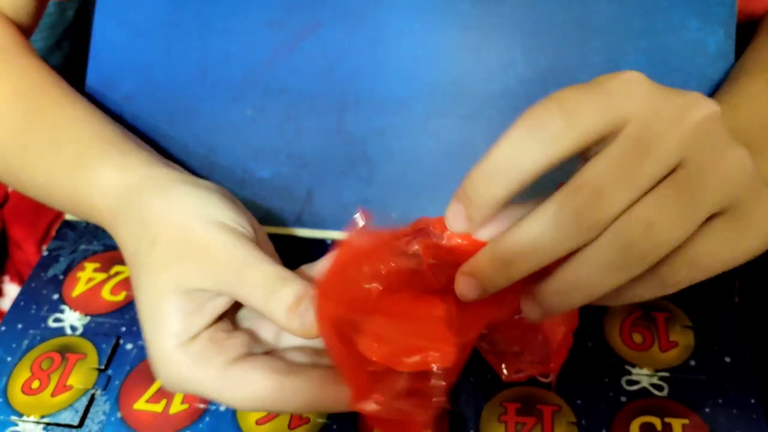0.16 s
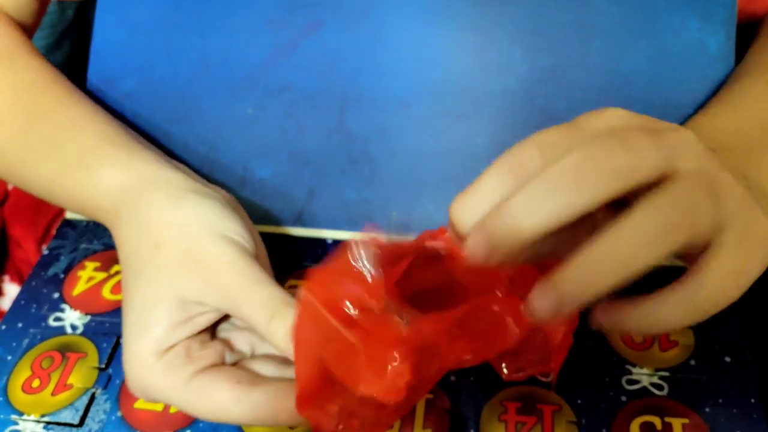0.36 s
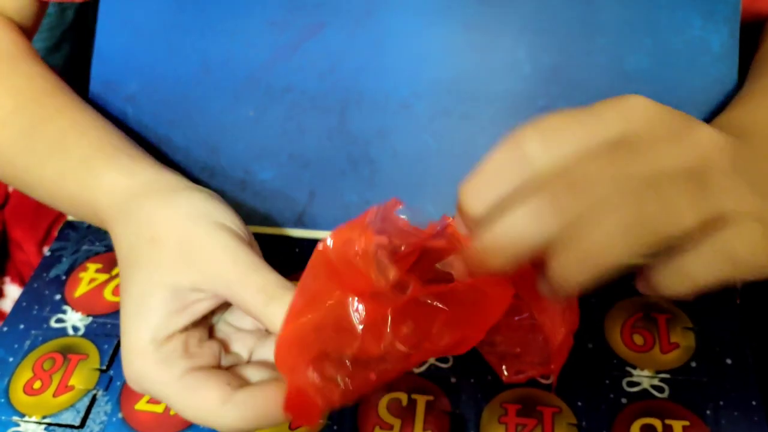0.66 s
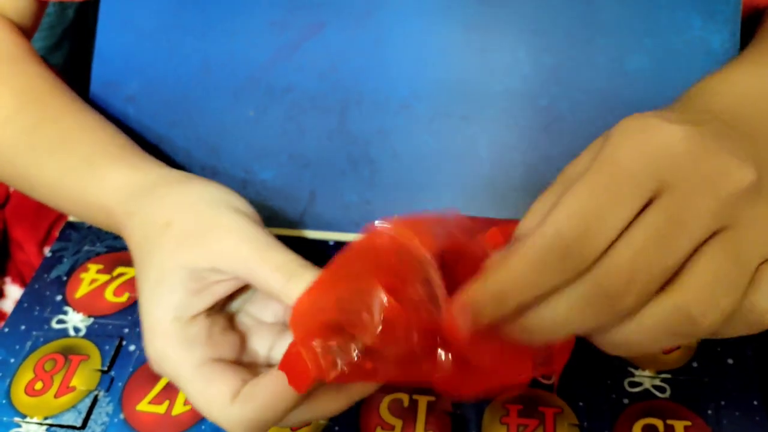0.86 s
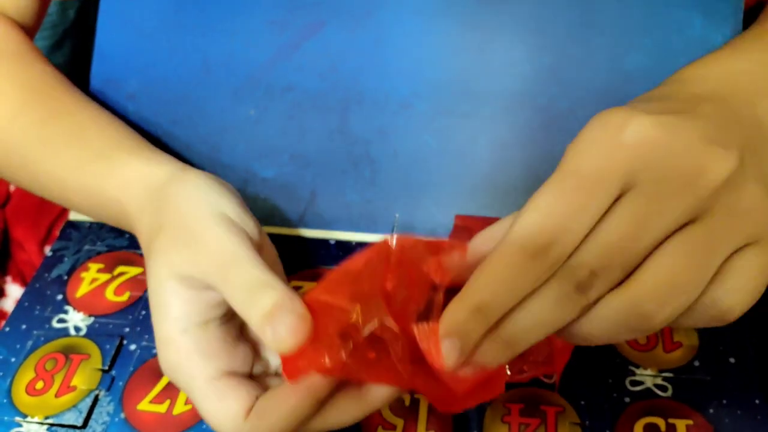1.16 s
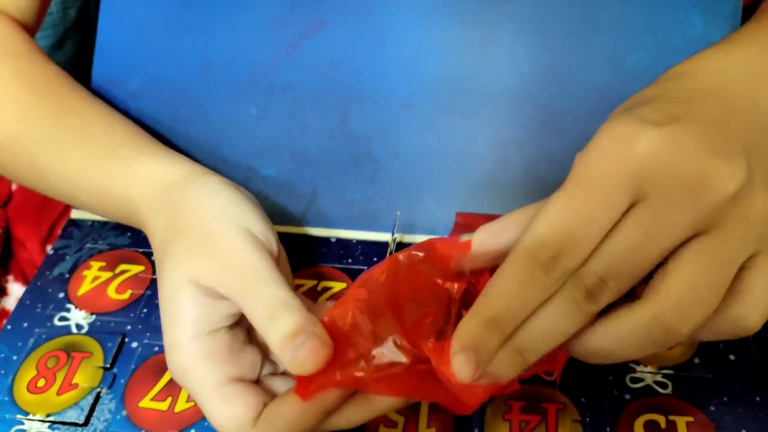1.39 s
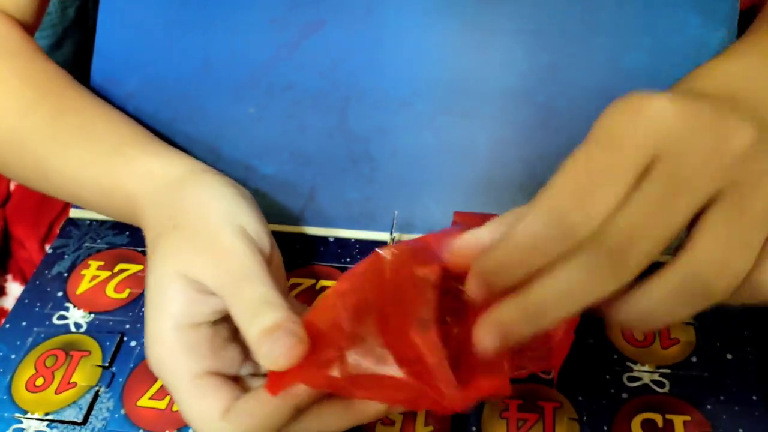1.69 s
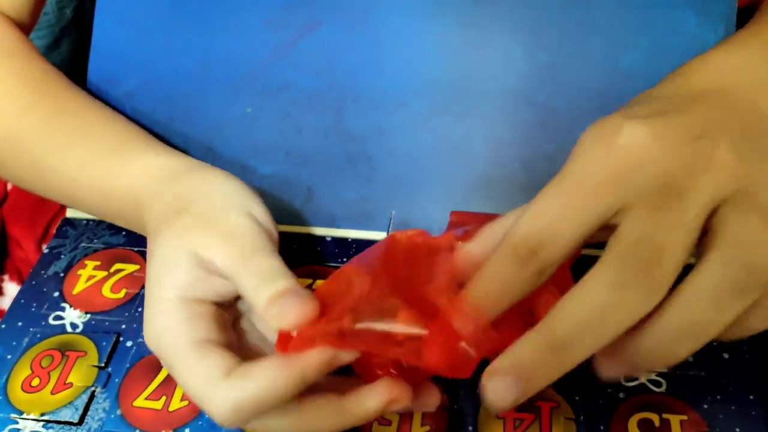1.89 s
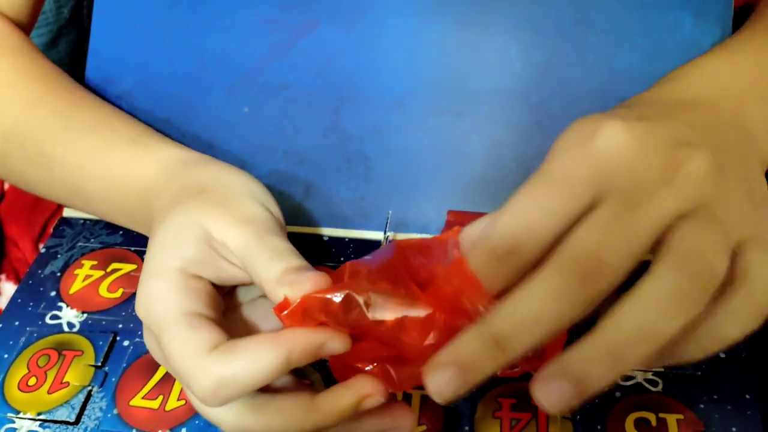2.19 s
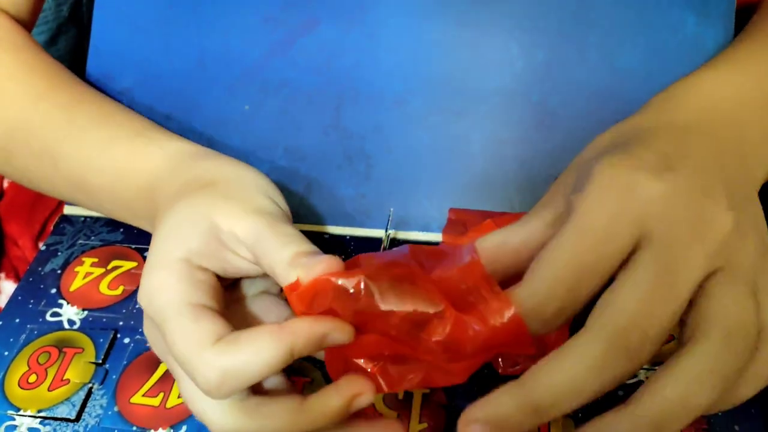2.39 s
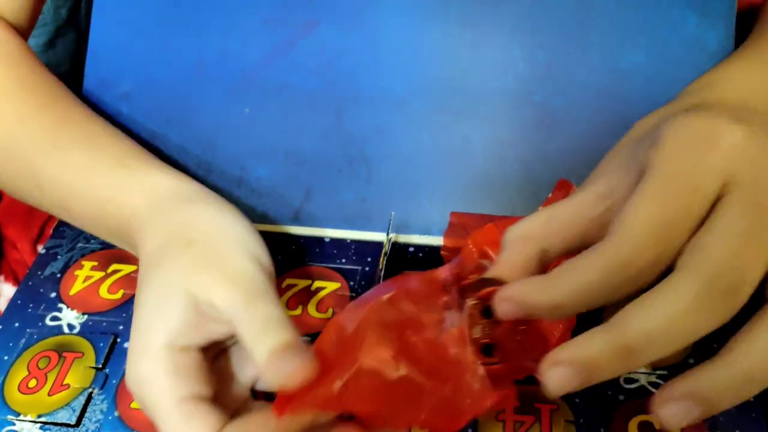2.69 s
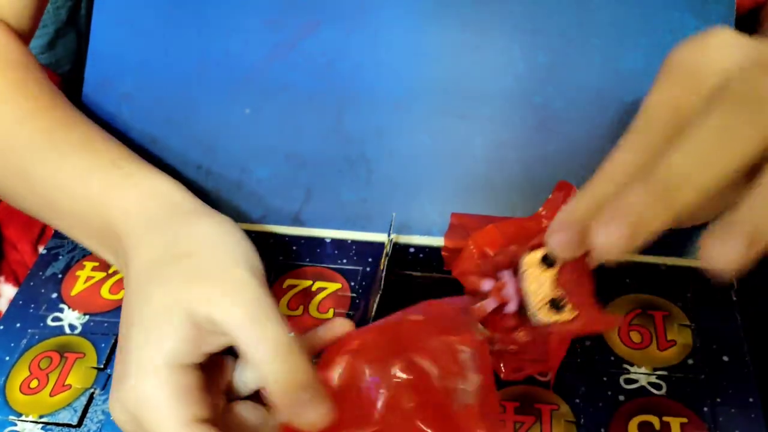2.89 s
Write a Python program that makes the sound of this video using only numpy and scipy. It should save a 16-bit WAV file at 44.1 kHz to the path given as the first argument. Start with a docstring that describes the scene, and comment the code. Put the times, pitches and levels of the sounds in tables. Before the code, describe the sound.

Thin plastic film crackles close to a stereo microphone in a small room. Light crinkles lead to a dense, bright burst at 0.35-0.5 s, with a soft table bump. It eases, then crinkles briskly from 1.0 to 1.55 s with faint low thuds. Sparse, quieter ticks follow until 2.3 s; from 2.55 s snaps return with short squeaky rubs, fading by 3 s. Soft room noise and wavering low hum continue throughout.

```python
"""A soft room noise and a wavering appliance hum run throughout, made of shaped noise and sine tones. Over them
hands pull open a thin plastic wrapper close to a two-port microphone: noise bursts snap and crackle as creases
buckle, over a noise rustle. Fingers soon bump the table, as short low sine pulses. Late on, fingers slide over
the film in pulls of squeaky noise. A small room answers the wrapper and hands."""
import sys
import numpy as np
from scipy import signal
from scipy.fft import rfft, irfft
from scipy.io import wavfile
from scipy.ndimage import map_coordinates

SR = 44100
rng = np.random.default_rng(int(sys.argv[2]) if len(sys.argv) > 2 else 0)


def file_out(sig):
    """Save sig as 16-bit WAV at sys.argv[1]."""
    # one column per channel
    cols = np.atleast_2d(sig).T
    # limit, then scale
    lim = np.clip(cols, -1, 1)
    pcm = np.round(lim * 32767).astype(np.int16)
    wavfile.write(sys.argv[1], SR, pcm)


N = 134505  # length in samples

# Loud creases giving way: start_s [s], level_db of the middle band [dB, energy as if held for 1 ms],
# body_db under 2 kHz and treble_db over 10 kHz [both dB relative to the middle band]
SNAPS = [(0.0431, -23.5, -13, -4), (0.081, -24, -19, -5.5), (0.0932, -35, -4, -14), (0.1086, -38, -5, -19),
         (0.1168, -25, -6.5, -24), (0.1228, -28.5, -15, -5), (0.19, -22.5, -23, -15),
         (0.1991, -21, -10.5, -7.5), (0.2045, -18.5, -32, -20), (0.2468, -31.5, -12, -29),
         (0.2612, -25, -11, -30), (0.298, -19, -27, -18), (0.3066, -18, -35, -9.5), (0.348, -15, -21, -15),
         (0.3607, -16.5, -22, -4), (0.3696, -20, -28, -1.5), (0.3897, -18, -12.5, -6),
         (0.4049, -18, -8.5, -6), (0.4116, -19.5, -31, -11), (0.4234, -33, -35, -15), (0.43, -20, -32, -1),
         (0.435, -17, -9.5, 0), (0.444, -11.5, -14, -11), (0.4484, -21, -2, 2), (0.451, -31, -16, -5),
         (0.4583, -13, -35, -5), (0.4674, -17.5, -16, -1), (0.476, -34, -17, 7), (0.4901, -22, -9, 2),
         (0.5223, -24.5, 0.5, 5.5), (0.5385, -33, -19, 3), (0.5465, -22.5, -35, -12), (0.566, -26, -5, -10),
         (0.5904, -27.5, -7, 2), (0.6375, -27.5, -6.5, -7), (0.695, -32, -10.5, -25), (0.718, -37, -22, 2),
         (0.7511, -24.5, -14.5, -0.5), (0.787, -25.5, -14, -6.5), (0.7952, -30, -24, -23),
         (0.803, -34.5, -14, -4), (0.8274, -27, -2, -9), (0.8335, -17, -12, -6), (0.8476, -23.5, -32, 0.5),
         (0.9078, -18, -47, -4), (0.9115, -25.5, -47, -15), (0.935, -37.5, -28, 4),
         (0.999, -32.5, -1.5, -1), (1.0131, -23, -44, -1), (1.0303, -20.5, -28, -23),
         (1.0394, -32.5, -2, -10), (1.049, -38, -24, -3), (1.0648, -20, -10, -6), (1.073, -15, -13.5, -5),
         (1.0829, -22, -14, -18.5), (1.0884, -17, -19.5, -0.5), (1.1129, -18.5, -14.5, -7.5),
         (1.1741, -24.5, -26, -5), (1.192, -36, -8, -4), (1.2164, -31.5, -15, 9), (1.2242, -22.5, -14, -9),
         (1.228, -20.5, -13, 0), (1.257, -19, -24, -1), (1.27, -21, -24, -2.5), (1.2931, -20, -5, 3),
         (1.3067, -24, -12, -7), (1.321, -37, -1, -9), (1.3408, -21.5, -7.5, -2.5),
         (1.3592, -16.5, -13, -4), (1.3673, -15.5, -9, -3), (1.387, -24.5, -2.5, -9),
         (1.4724, -25, -10.5, -9), (1.517, -17.5, -9, -12), (1.532, -15, -9, -7.5), (1.542, -19.5, -16, -6),
         (1.548, -21, -9.5, -5), (1.646, -37.5, 4, -30), (1.666, -27.5, -24, -5.5),
         (1.7006, -30.5, -6.5, -7), (1.7102, -33, -3, -15), (1.7248, -30, 1.5, 1), (1.74, -31, -2.5, -7),
         (1.7791, -29.5, -3.5, -4.5), (1.788, -41.5, -23, 9), (1.815, -42, -22, 5),
         (1.862, -40.5, -2.5, 1.5), (1.8816, -33, -7, -1), (1.8923, -34, -7.5, -5), (1.9026, -31, -14, -1),
         (1.943, -25.5, -7.5, -36), (1.9595, -31.5, -15, -20), (1.97, -28, -17, -10),
         (1.9767, -22.5, -10.5, -9), (1.998, -31, -7.5, -17), (2.0526, -24, -7, -27),
         (2.2288, -37.5, -1.5, -37), (2.3341, -21.5, -6.5, -10.5), (2.3379, -21.5, -18, -7.5),
         (2.4017, -31.5, -31, -7), (2.4172, -38.5, 10, -20.5), (2.4626, -30.5, -28, -10),
         (2.559, -21.5, -20, -11), (2.5688, -34, -17, -4), (2.5779, -24.5, -13, -6), (2.595, -25, -10, -10),
         (2.5987, -22, -25, -6), (2.6054, -27, -17, -2), (2.6424, -18.5, -12, -29),
         (2.6624, -20.5, -17, -4), (2.671, -29.5, -0.5, 5), (2.7575, -23.5, -13, -6),
         (2.768, -33.5, -5, -19), (2.7933, -32.5, -9, -1), (2.8651, -37, -2.5, -17),
         (2.9393, -34.5, -6, -1), (3.001, -45.5, 1, -19)]
# Tone of the plastic film: pitch_hz [Hz], level_db [relative dB per Hz]
FILM = [(150, 5), (250, -14.5), (504, -8), (643, -12), (882, -6), (1780, 0), (1970, 2.5), (3840, -1),
        (5170, -6), (6720, -0.5), (11200, -13), (15000, -5.5), (16400, -44)]
LOW_HZ = 250  # film and sliding sounds have little or nothing below this


def amp(db):
    """Turn decibels into a plain multiplier."""
    return 10 ** (np.asarray(db) / 20)


def unit(x):
    """Scale a sound to an rms of 1."""
    return x / np.sqrt(np.mean(x ** 2) + 1e-20)


def along(points, hz):
    """Read a curve of (Hz, value) points, with pitch on a log axis."""
    point_hz, value = np.transpose(points)
    return np.interp(np.log(hz + 1), np.log(point_hz + 1), value)


def wobble(rate):
    """Draw a smooth random curve through `rate` chance points a second."""
    points = rng.standard_normal(int(N * rate / SR) + 4)
    return map_coordinates(points, [np.arange(N) * rate / SR])


def pair(a, b, hz):
    """Mix two unrelated spectra into left and right, as alike at each pitch as the two ports are."""
    # Likeness of the ports: pitch_hz [Hz], likeness [1 = the same, 0 = unrelated]
    likeness = [(60, 0.51), (300, 0.77), (800, 1), (1500, 0.48), (4000, 0.057), (15000, 1)]
    turn = np.arccos(np.clip(along(likeness, hz), -1, 1)) / 2
    shared, different = np.cos(turn) * a, np.sin(turn) * b
    return np.array([shared + different, shared - different])


def hiss(spectrum, low_hz):
    """Make stereo noise of rms 1 by shaping random noise to a tone curve, with nothing below low_hz."""
    hz = np.fft.rfftfreq(N, 1 / SR)
    left_right = pair(*rfft(rng.standard_normal((2, N))), hz)
    return unit(irfft(left_right * amp(along(spectrum, hz)) * (hz > low_hz), N))


def background():
    """Soft room noise plus appliance tones whose loudness and pitch both waver."""
    # Tone of the room noise: pitch_hz [Hz], level_db [relative dB per Hz]
    air = [(15, -33), (25, -9), (82, 16), (1480, -5), (2000, 9.5), (7310, -58), (9070, -49), (14800, -38),
           (16000, -51)]
    # Hum tones: pitch_hz [Hz], level_db [dB, before the lift below], waver_hz [Hz]
    hum_tones = [(58.4, -75, 2.6), (70.4, -67, 5.9), (124.6, -68.5, 3)]
    air_db, hum_lift_db, hum_waver_db = -57, 4.5, 3.1
    port_phase = np.array([[.3], [-.3]])  # radians
    hum = 0
    for pitch_hz, level_db, waver_hz in hum_tones:
        level = amp(level_db + hum_lift_db + hum_waver_db * wobble(9.3))
        phase = 2 * np.pi * np.cumsum(pitch_hz + waver_hz * wobble(15)) / SR
        hum = hum + level * np.sin(phase + port_phase)
    return amp(air_db) * hiss(air, low_hz=18) + hum


def resonance(hz, db, q, centre_hz):
    """Let the sound through as it is, plus a boost around one ringing pitch; higher q is narrower."""
    return 1 + amp(db) / (1 + 1j * q * (hz / centre_hz - centre_hz / (hz + 1)))


def snaps(rows, size):
    """Each row is a burst that rises fast, dies away and rings a patch of film; its hollow body dies slower."""
    # Difference between the ports: pitch_hz [Hz], left_minus_right_db [dB]
    ports = [(300, -0.5), (1300, 6.5), (2400, 1), (4400, -2.5), (7000, -5.5), (10000, 3), (15000, -6)]
    lag_s, lag_spread_s = .00005, .00008  # right behind left
    pan_db, pan_spread_db = -2, 2.5  # left minus right
    rise_s, lead_s, lead_db = .0004, .001, -22  # lead: the crease creaks just before it gives
    snap_t60_s, treble_t60_s, body_t60_s = .0065, .005, .014  # typical time to die by 60 dB
    life_spread, ring_spread = .3, .3  # chance spread of lifetimes and pitches, in natural-log units
    ring_hz, ring_db, ring_q = 5030, 9, 3.5  # the patch of film
    hollow_hz, hollow_db, hollow_q = 625, 9.5, 5.7  # the pocket of air in the wrapper
    thin_hz, thin_slope = 1490, .21  # the less body a snap has, the higher its middle band starts

    start_s, level_db, body_db, treble_db = np.transpose(rows)[..., None]
    t = np.arange(size) / SR - .003  # leave room for the creak before the snap
    hz = np.fft.rfftfreq(size, 1 / SR)
    noise = rng.standard_normal((len(rows), 2, size))
    life = rng.standard_normal((len(rows), 1, 1))
    delay, patch, side, pocket = rng.standard_normal((4, len(rows), 1))

    # half of each port difference goes to the left, the opposite half to the right
    lag = np.exp(1j * np.pi * hz * (lag_s + lag_spread_s * delay))
    lean = lag * amp((pan_db + pan_spread_db * side + along(ports, hz)) / 2)
    film = amp(along(FILM, hz)) / (1 + (LOW_HZ / (hz + 1)) ** 4)

    def band(t60_s, shape):
        """Make one band of every burst at both ports, with energy 1 in their mean."""
        creak = amp(lead_db) * np.exp(-abs(t) / lead_s)
        rise = (t > 0) * (1 - np.exp(-abs(t) / rise_s)) ** 2
        fade = amp(-60 * t / (t60_s * np.exp(life_spread * life)))
        spectra = rfft(noise * (creak + rise * fade)).swapaxes(0, 1)
        wave = irfft(pair(*spectra, hz) * [lean, 1 / lean] * film * shape, size)
        return wave / np.linalg.norm(wave.mean(0), axis=1)[:, None]

    low = 1 / (1 + (hz / 2000) ** 6)
    high = 1 / (1 + (10000 / (hz + 1)) ** 12)
    thinning = 1 + (thin_hz * amp(-thin_slope * body_db) / (hz + 1)) ** 4
    film_ring = resonance(hz, ring_db, ring_q, ring_hz * np.exp(ring_spread * patch))
    hollow_ring = resonance(hz, hollow_db, hollow_q, hollow_hz * np.exp(ring_spread * pocket))
    middle = band(snap_t60_s, film_ring * (1 - low - high) / thinning)
    treble = amp(treble_db) * band(treble_t60_s, high)
    body = amp(body_db) * band(body_t60_s, low * hollow_ring)
    # the root turns a level held for 1 ms into energy
    bursts = (middle + treble + body) * amp(level_db) * np.sqrt(SR / 1000)
    at = np.round((start_s + t) * SR).astype(int).ravel()
    return np.array([np.bincount(at, port.ravel(), N)[:N] for port in bursts])


def crackle_and_rustle():
    """Small creases crackle as hard as the film is worked, and harder after a loud snap, over a rustle."""
    # How hard the hands work the film: time_s [s], level_db [dB, before the crack and rustle offsets]
    handling = [(0.0, -40.5), (0.15, -44), (0.29, -41), (0.41, -33), (0.455, -28), (0.5, -34),
                (0.63, -49.5), (0.8, -44), (0.96, -41.5), (1.08, -35), (1.36, -34.5), (1.45, -44),
                (2.3, -45.5), (2.78, -40), (2.92, -43.5), (3.05, -58)]
    cracks_per_s, crack_db, crack_spread_db = 300, -6.5, 1.5
    crack_body_db, crack_treble_db = -12.5, -7.5  # relative to the middle band
    cluster_s, cluster_db = .0096, -12.5  # small cracks trail a loud snap
    rustle_db, rustle_waver_db = -8, 3.1

    chance = rng.random((1200, 4))  # enough cracks to outlast the scene
    at_s = .004 + np.cumsum(-np.log(chance[:, 0] + 1e-9)) / cracks_per_s
    snap_s, snap_db = np.transpose(SNAPS)[:2]
    since_s = at_s[:, None] - snap_s
    trail = (since_s > 0) * np.exp(-(since_s / cluster_s) ** 2)
    after_snaps = np.linalg.norm(amp(snap_db + cluster_db) * trail, axis=1)
    time_s, handling_db = np.transpose(handling)
    handled = amp(np.interp(at_s, time_s, handling_db) + crack_db)
    strength_db = 20 * np.log10(after_snaps + handled)

    level_db = strength_db - crack_spread_db * (1 + np.log(chance[:, 1] + .076))
    body_db = crack_body_db + 14 * (chance[:, 2] - .5)
    treble_db = crack_treble_db + 10 * (chance[:, 3] - .5)
    cracks = snaps(np.array([at_s, level_db, body_db, treble_db]).T, size=1024)

    # the rustle holds the strength of the latest crack, before that crack's own chance spread
    held_db = strength_db[np.searchsorted(at_s[1:], np.arange(N) / SR)]
    rustle = amp(held_db + rustle_db + rustle_waver_db * wobble(68)) * hiss(FILM, LOW_HZ)
    return cracks + rustle


def room(x):
    """Each pitch of the room's answer dies at its own speed; each fifth of a second gets a new answer."""
    # Dying away: pitch_hz [Hz], t60_s [s to fall by 60 dB]
    dying = [(300, 0.18), (3000, 0.24), (15000, 0.069)]
    out, step, gap = np.zeros((2, N + SR)), SR // 5, 90  # gap: samples before the answer
    for start in range(0, N, step):
        hz, t, spectra = signal.stft(rng.standard_normal((2, SR // 4)), SR, nperseg=256)
        fade = amp(-60 * t / along(dying, hz)[:, None])
        tail = signal.istft(pair(*spectra, hz[:, None]) * fade, SR, nperseg=256)[1]
        answer = signal.fftconvolve(x[:, start:start + step], tail / np.linalg.norm(tail[0]), axes=1)
        out[:, start + gap:start + gap + answer.shape[1]] += answer
    return out[:, :N]


def table_bumps():
    """Fingers bump the table: each bump is a low sine that swells and dies within a few cycles."""
    # Bumps: start_s [s], level_db [dB, top of the swell], pitch_hz [Hz]
    thumps = [(0.345, -45, 168), (0.442, -29, 345), (0.987, -41, 183), (1.081, -38.5, 176),
              (1.523, -38.5, 238), (1.719, -37.5, 310), (2.056, -42, 91)]
    swell_cycles = .48  # from the start to the top of the swell
    out, t = np.zeros(N + SR), np.arange(SR // 8) / SR
    for start_s, level_db, pitch_hz in thumps:
        progress = pitch_hz * t / swell_cycles
        bump = np.sin(2 * np.pi * pitch_hz * t) * progress * np.exp(1 - progress)
        out[round(start_s * SR):][:len(t)] += amp(level_db) * bump
    return out[:N]


def finger_slides():
    """Fingers slide over the film in uneven pulls: rubbing noise with a resonant squeak at each pull's pitch."""
    # Pulls: start_s [s], length_s [s], level_db [dB rms before the swell and waver], squeak_hz [Hz]
    scrapes = [(2.563, 0.077, -41.5, 830), (2.695, 0.045, -36.5, 1160), (2.761, 0.045, -40.5, 1090),
               (2.804, 0.052, -41, 1480), (2.884, 0.051, -42, 1610), (2.934, 0.012, -40, 1280)]
    # Tone of the rubbing: pitch_hz [Hz], level_db [relative dB per Hz]
    slide_tone = [(300, -4.5), (600, -5.5), (1200, -1.5), (1600, -3.5), (3000, -1), (8000, -9.5),
                  (16000, -26)]
    squeak_db, squeak_q, waver_db = 8.5, 6.5, 3.5
    t, hz = np.arange(N) / SR, np.fft.rfftfreq(N, 1 / SR)
    rub = rfft(hiss(slide_tone, LOW_HZ))
    pulls = 0
    for start_s, length_s, level_db, squeak_hz in scrapes:
        swell = np.exp(-(2 * (t - start_s) / length_s - 1) ** 4)
        squeak = unit(irfft(rub * resonance(hz + 1, squeak_db, squeak_q, squeak_hz), N))
        pulls = pulls + amp(level_db) * swell * squeak
    return pulls * amp(waver_db * wobble(120))


def scene():
    """Add the wrapper and the hands, the room's answer to them, and the background."""
    room_db = -12.5
    wrapper = snaps(SNAPS, size=2048) + crackle_and_rustle()
    near = wrapper + table_bumps() + finger_slides()
    return near + amp(room_db) * room(near) + background()


def record(dry):
    """Keep nothing at or above the band limit."""
    top_hz = 16700
    return irfft(rfft(dry) * (np.fft.rfftfreq(N, 1 / SR) < top_hz), N)


dry = scene()
out = record(dry)
file_out(out)
```